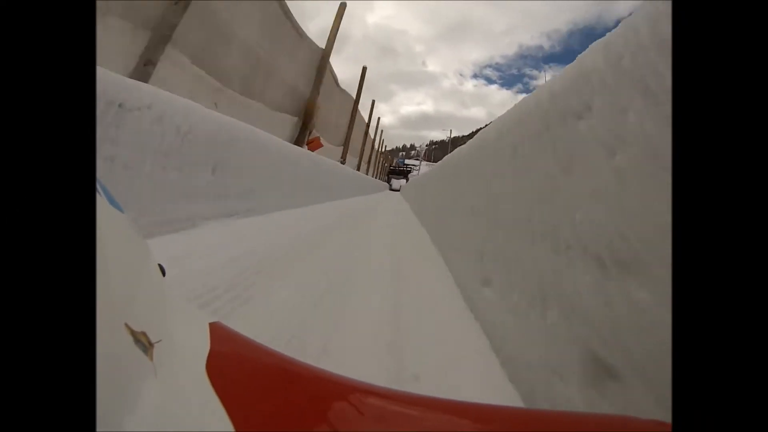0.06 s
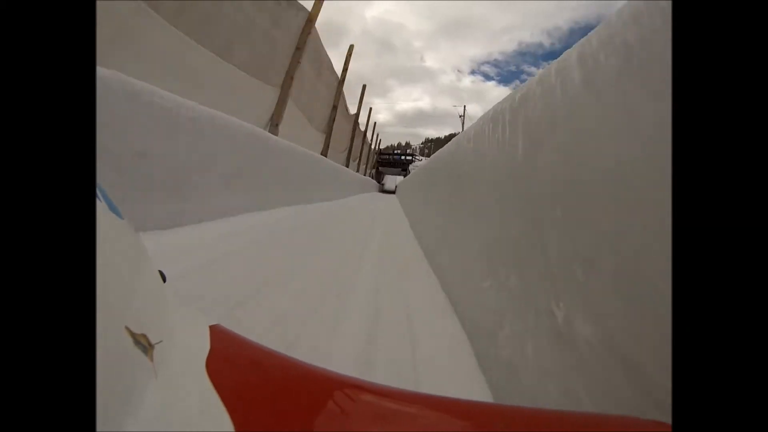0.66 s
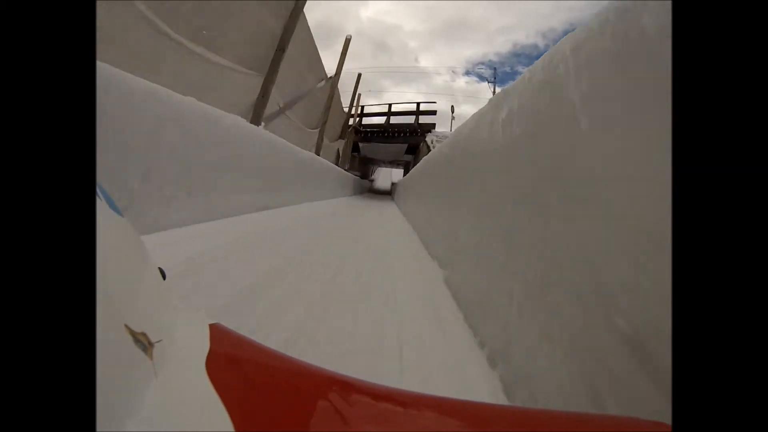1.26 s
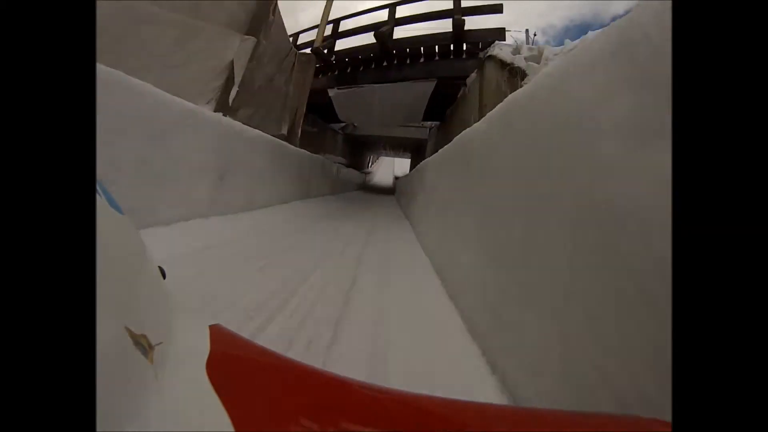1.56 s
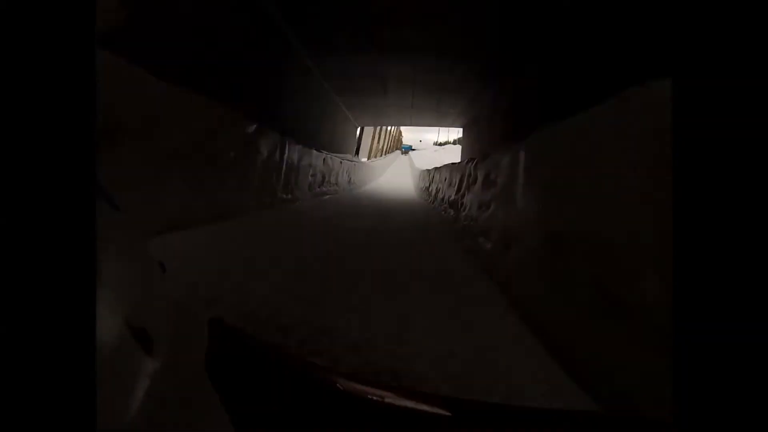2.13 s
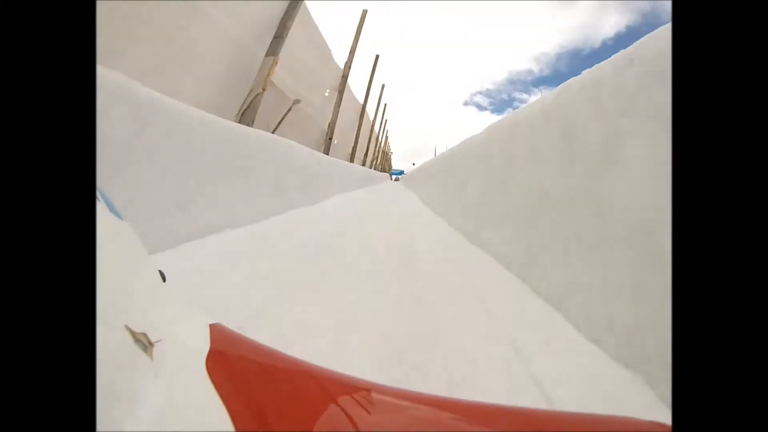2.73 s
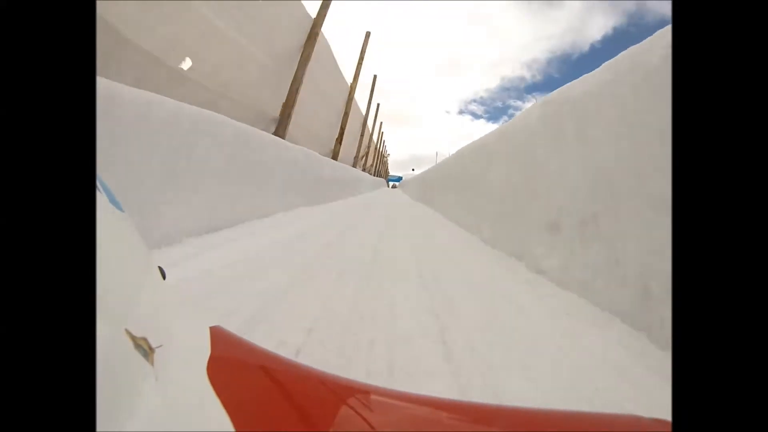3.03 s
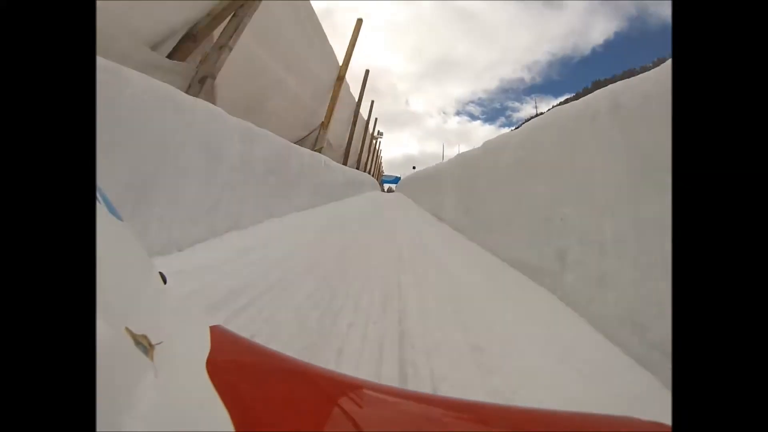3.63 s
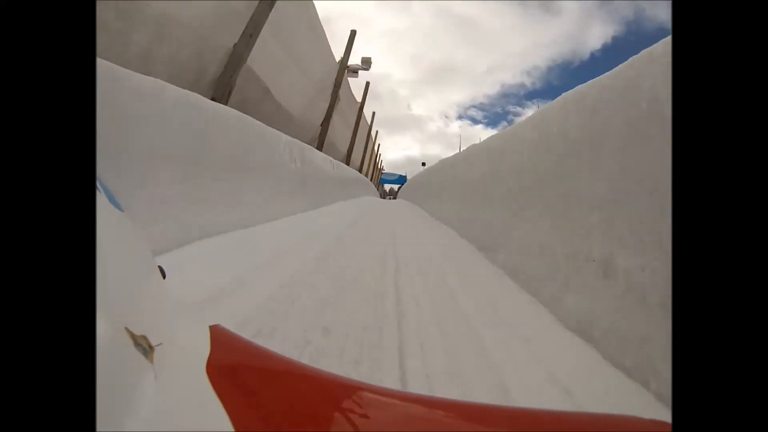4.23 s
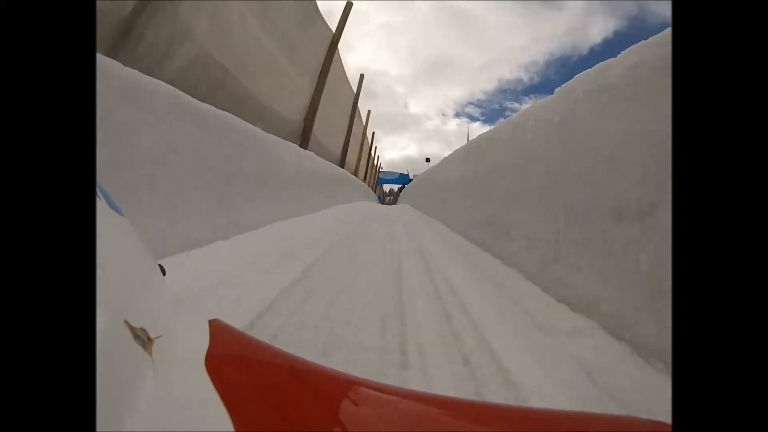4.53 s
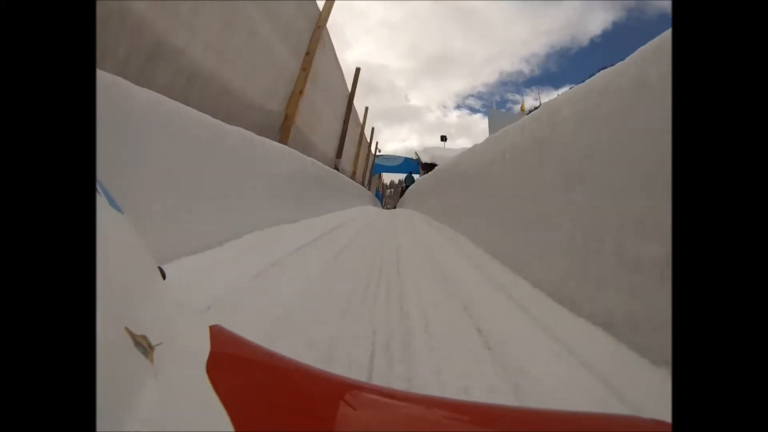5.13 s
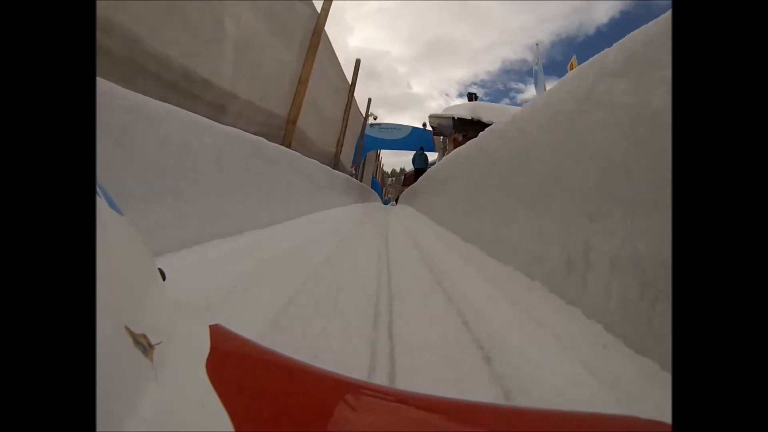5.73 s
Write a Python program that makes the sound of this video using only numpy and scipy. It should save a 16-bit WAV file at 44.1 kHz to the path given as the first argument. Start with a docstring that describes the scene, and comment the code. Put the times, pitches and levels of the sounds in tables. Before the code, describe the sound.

A bobsled speeds down an icy track with a deep booming rumble, buffeting wind, scraping runners and rattling fittings.

```python
"""A bobsled runs down an iced track, heard from a cased camera fixed to its hull.
From the start the hull booms near 35 Hz, air buffets the case, and the runners grind over the ice
and ring the shell. Ruts jolt the sled, loose fittings rattle and the mount ticks, hardest near 2.9 s.
After 4 s the runners scrape and bite harder; from 5.1 s the sled glides, with a last run of scrapes
around 5.7 s. The case muffles the treble throughout."""
import sys
import numpy as np
from scipy import signal
from scipy.fft import rfft, irfft, next_fast_len
from scipy.io import wavfile
from scipy.ndimage import uniform_filter1d

SR = 44100
rng = np.random.default_rng(int(sys.argv[2]) if len(sys.argv) > 2 else 0)


def dump(signal):
    """Clip the signal to [-1, 1] and save it as 16-bit WAV at the path in sys.argv[1]."""
    limited = np.clip(np.atleast_2d(signal).T, -1, 1)
    pcm = np.round(limited * 32767).astype(np.int16)
    wavfile.write(sys.argv[1], SR, pcm)


N = 264159

# ruts in the track: t/s, level/dB, relative frame knock/dB
RUTS = [(0.578, -27, -6), (0.907, -23.5, -24), (0.967, -33, -2), (1.114, -19.5, -9), (1.177, -28, -4),
        (1.528, -20, -21), (1.571, -17, -27), (1.654, -20.5, -12), (1.966, -21.5, -12),
        (2.366, -22.5, -10.5), (2.712, -25, -19), (2.73, -23, -20), (2.773, -25, -12), (2.8715, -18, 1),
        (2.8775, -12, -11), (2.916, -13, -17), (2.98, -22, -31), (3.005, -23.5, -8), (3.073, -26.5, -10),
        (3.112, -27.5, -5), (3.732, -25.5, -6)]
# modes of the loose fittings: f/Hz, t60/s, relative level/dB
FITTING_MODES = [(1350, 0.031, -2), (1531, 0.042, 23), (1620, 0.028, 18), (2030, 0.03, 16.5),
                 (2294, 0.058, 6.5), (2770, 0.014, 13), (3034, 0.022, 21.5), (3383, 0.022, 29.5),
                 (3410, 0.026, 21)]
# EQ of a dry, bright tick: f/Hz, gain/dB
TICK_EQ = [(1500, -3), (4000, -5), (7000, -1), (8300, -7), (11400, -1.5), (13100, -14), (14500, -13),
           (15800, -38)]


def undb(db):
    """Decibels to gain."""
    return 10 ** (np.asarray(db) / 20)


def unit(x):
    """Scale to rms 1."""
    return x / np.sqrt(np.mean(x ** 2))


def curves(table):
    """Automation lanes: each column after the time, interpolated at every sample."""
    s, *columns = np.transpose(table)
    return [np.interp(np.arange(N) / SR, s, c) for c in columns]


def swell(s, length_s):
    """A smooth bump of height 1 centred on s."""
    return np.exp(-(2 * (np.arange(N) / SR - s) / length_s) ** 2)


def walk(rate):
    """Smooth random modulation with rms 1: levels held 1 / rate s and slewed twice."""
    hold = max(int(SR / rate), 2)
    held = rng.standard_normal(N // 16)[np.arange(N) // hold]
    return unit(uniform_filter1d(uniform_filter1d(held, hold), hold))


def grains(rate, spread_db):
    """Random tiny impacts, rate a second, a few much larger than the rest."""
    struck = rng.random(N) < rate / SR
    size = undb(spread_db * np.minimum(rng.exponential(size=N), 5))
    return unit(struck * size * rng.choice([-1, 1], N))


def spurts(rate, decay_s):
    """Envelope of brief random bursts, rate a second, with rms 1."""
    hits = (rng.random(N) < rate / SR) * rng.uniform(0, 1, N) ** 2
    power = signal.lfilter([1], [1, -np.exp(-1 / (decay_s * SR))], hits + 1e-12)
    return unit(np.sqrt(power))


def colour(x, points):
    """Causal EQ through (f/Hz, gain/dB) points, falling 12 dB an octave beyond the ends."""
    hz, db = np.transpose(points)
    size = next_fast_len(2 * len(x), real=True) // 2 * 2
    f = np.maximum(np.fft.rfftfreq(size, 1 / SR), 1)
    skirts_db = 12 * (np.minimum(np.log2(f / hz[0]), 0) - np.maximum(np.log2(f / hz[-1]), 0))
    gain = undb(np.interp(np.log(f), np.log(hz), db) + skirts_db)
    cepstrum = irfft(np.log(gain))
    cepstrum[1:size // 2] *= 2  # minimum phase: nothing rings ahead of a hit
    cepstrum[size // 2 + 1:] = 0
    return irfft(rfft(x, size) * np.exp(rfft(cepstrum)))[:len(x)]


def resonate(x, hz, width):
    """One resonance, gain 1 at its centre."""
    return signal.lfilter(*signal.iirpeak(hz, hz / width, fs=SR), x)


def modes(table, t, detune):
    """Decaying sines, one row a mode, slightly retuned at every call."""
    hz, t60, db = np.transpose(table)[:, :, None]
    hz = hz * (1 + detune * rng.standard_normal(hz.shape))
    return undb(db) * np.exp(-np.log(1000) * t / t60) * np.sin(2 * np.pi * hz * t)


def add(out, s, db, sound):
    """Mix in a short sound whose loudest 3 ms have the given level."""
    loudest = np.sqrt(uniform_filter1d(sound ** 2, size=132, mode="constant").max())
    start = max(int(s * SR), 0)
    out[start:start + len(sound)] += (sound * undb(db) / loudest)[:N - start]


def ride(patchy_db=0.14, rut_decay_s=0.032, rut_shake_db=5.5, rut_bite_db=2.5):
    """How hard the hull shakes and the runners bite, in dB: track, scrapes, ruts and uneven ice."""
    # state of the track: t/s, shake/dB, bite/dB
    track = [(0.0, -37, -41.5), (0.18, -44.5, -48.5), (0.3, -34, -43), (0.55, -37.5, -43.5),
             (0.74, -41, -45.5), (1.3, -37.5, -45), (1.66, -33, -45.5), (1.84, -40.5, -47),
             (2.46, -38, -48.5), (2.515, -48, -61), (2.68, -42, -52.5), (2.76, -37.5, -45), (3.2, -38, -49),
             (3.72, -32, -45.5), (3.97, -39, -45), (4.12, -34.5, -34.5), (4.42, -43.5, -40),
             (4.55, -38.5, -45), (4.63, -40.5, -38), (4.76, -33.5, -39.5), (4.83, -43, -46.5),
             (5.11, -43.5, -49.5), (5.135, -49, -62.5), (5.99, -48.5, -60)]
    # a runner scrapes sideways: t/s, length/s, extra shake/dB, extra bite/dB
    scrapes = [(0.374, 0.048, -0.5, 9), (0.862, 0.057, 5, 6), (1.304, 0.076, 8, 5.5), (1.558, 0.068, 4, 10),
               (1.956, 0.033, 8, 4.5), (2.881, 0.075, 10.5, 6.5), (3.443, 0.42, -4, 8),
               (3.837, 0.051, 4, 9.5), (4.16, 0.14, 9, 6.5), (4.418, 0.06, -2.5, 5), (4.498, 0.062, 3, 6),
               (4.645, 0.019, 4.5, -2), (4.906, 0.034, 12, 5.5), (5.549, 0.1, 5, 11), (5.664, 0.055, 6, 10),
               (5.776, 0.1, 12, 10.5)]
    shake_db, bite_db = curves(track)
    for s, length_s, more_shake_db, more_bite_db in scrapes:
        scrape = swell(s, length_s)
        shake_db += more_shake_db * scrape
        bite_db += more_bite_db * scrape
    t, rut_s = np.arange(N) / SR, np.sort(np.array(RUTS)[:, 0])
    since_rut_s = np.abs(t - rut_s[np.searchsorted(rut_s, t) - 1])
    load = np.exp(-since_rut_s / rut_decay_s)
    patches = patchy_db * walk(22.01)
    return shake_db + rut_shake_db * load + patches, bite_db + rut_bite_db * load + patches


def creaks():
    """Under the hardest blows the mount gives way in a dense run of tiny slips."""
    # creaks of the mount: t/s, length/s, level/dB
    strains = [(2.92, 0.04, -56), (3.1, 0.077, -64)]
    slips = unit(colour(grains(450, spread_db=3), TICK_EQ))
    return slips * sum(undb(db) * swell(s, length_s) for s, length_s, db in strains)


def crumbs(bite_db, db=-69, follow=0.4, splinter_s=0.0002):
    """Ice crumbs crack under the runners; they only partly follow the bite, so a glide exposes them."""
    # EQ of a cracking crumb: f/Hz, gain/dB
    crumb_eq = [(2000, 1), (4200, 8), (7000, -4), (9000, -9.5), (12000, -11.5)]
    t = np.arange(256) / SR
    cracks = grains(110, spread_db=3)
    splinter = rng.standard_normal(len(t)) * np.exp(-t / splinter_s)
    crunch = unit(colour(np.convolve(cracks, splinter)[:N], crumb_eq))
    return crunch * undb(db + follow * (bite_db - bite_db.mean()))


def spray(bite_db, shake_db, hiss_db=-55, crackle_db=-80, crackle_follow=0.91, follow=0.96):
    """Ice dust hisses past and single crumbs prick the case; bumps and biting runners throw up more."""
    # loose ice dust on the track: t/s, relative level/dB
    dust = [(0, -6.5), (1.5, -5), (1.9, -8.5), (2.8, -9), (3.5, -12), (4.6, -18), (5.1, -8.5), (5.3, -11),
            (5.8, -12), (5.99, -2)]
    # EQ of the flying dust: f/Hz, gain/dB
    hiss_eq = [(2500, 9), (4300, 4), (5400, 5), (6200, -4.5), (7400, -2), (8300, -13), (11500, -7),
               (13000, -22), (14500, -29.5)]
    load_db = 0.06 * bite_db + 0.94 * shake_db
    thrown_db = follow * (load_db - load_db.mean()) + curves(dust)[0]
    hiss = unit(colour(grains(4000, spread_db=3.5), hiss_eq) * undb(2 * walk(50)))
    crackle = unit(colour(grains(100, spread_db=4.5), TICK_EQ))
    return undb(hiss_db + thrown_db) * hiss + undb(crackle_db + crackle_follow * thrown_db) * crackle


def ticks(trim_db=-3, slip_s=0.0012):
    """The plastic mount slips under load with dry, bright ticks."""
    # slips of the mount: t/s, level before the trim/dB
    slips = [(0.417, -45), (0.58, -49), (0.9102, -47), (1.0375, -48), (1.5253, -50), (1.854, -47),
             (1.966, -42), (2.175, -43.5), (2.189, -53), (2.219, -52), (2.375, -44), (2.403, -44.5),
             (2.4767, -49), (2.496, -40), (2.877, -42.5), (2.8938, -47), (2.909, -31.5), (2.9147, -48),
             (2.926, -41), (2.9397, -44), (2.9565, -43), (2.971, -49), (2.989, -49), (3.0051, -45),
             (3.025, -49), (3.074, -54), (3.1157, -45), (3.1418, -46), (4.108, -45), (4.239, -47),
             (5.045, -58), (5.219, -59), (5.367, -61), (5.808, -53)]
    out, t = np.zeros(N), np.arange(512) / SR
    for s, db in slips:
        burst = rng.standard_normal(len(t)) * np.exp(-t / slip_s)
        add(out, s, db + trim_db, colour(burst, TICK_EQ))
    return out


def chips(crumble_s=0.0033, attack_s=0.0011):
    """A chip of ice shatters in a few milliseconds and rings the spot of the shell that it hits. The row at
    2.877 s is no chip: it is the hardest rut cracking through the shell."""
    # chip strikes, plus the crack of the hardest rut at 2.877 s: t/s, level/dB, f/Hz
    strikes = [(0.775, -46, 3160), (2.567, -47.5, 1450), (2.596, -59, 3860), (2.686, -46, 3760),
               (2.748, -41, 3160), (2.769, -42, 3850), (2.822, -41, 3600), (2.836, -37, 1340),
               (2.877, -30, 2330), (3.416, -38, 3200), (4.289, -42, 3060), (4.413, -41, 2320),
               (4.433, -38, 2350), (4.484, -37, 2370), (5.24, -50, 1400)]
    out, t = np.zeros(N), np.arange(1536) / SR
    for s, db, hz in strikes:
        shatter = rng.standard_normal(len(t)) * np.exp(-t / crumble_s) * np.minimum(t / attack_s, 1)
        add(out, s, db, resonate(resonate(shatter, hz, hz / 7), hz, hz / 3))
    return out


def jiggle(bite_db, gain_db=-12, upper_db=-4, split_hz=2600, count=4):
    """Several unlike fittings keep chattering softly, low and high modes in their own time."""
    out, t = np.zeros(N), np.arange(2048) / SR
    upper = np.array(FITTING_MODES)[:, 0] > split_hz
    for _ in range(count):
        ring = modes(FITTING_MODES, t, detune=0.035)
        for part, db in ((~upper, 0), (upper, upper_db)):
            contact = spurts(rate=16, decay_s=0.009) * rng.standard_normal(N)
            out += undb(db) * unit(signal.fftconvolve(contact, ring[part].sum(0))[:N])
    return out / np.sqrt(count) * undb(gain_db + bite_db)


def wind(shake_db, db=-39, follow=0.54):
    """The headwind buffets the case, harder when the sled is shaken."""
    # f/Hz, gain/dB
    buffet_eq = [(25, -9.5), (52, -2.5), (66, 0.5), (95, -7), (135, -3.5), (210, -25.5), (600, -36.5)]
    buffet = unit(colour(rng.standard_normal(N), buffet_eq))
    return undb(db + walk(11) + follow * (shake_db - shake_db.mean())) * buffet


def drumming(hz=153, waver=0.0522):
    """Long bumps set the hull's panels swelling and fading on one unsteady hollow note."""
    # long bumps: t/s, length/s, level/dB
    bumps = [(1.237, 0.077, -35), (1.706, 0.074, -37), (3.122, 0.057, -35), (3.764, 0.11, -34.5),
             (4.705, 0.08, -36), (4.966, 0.099, -36.5), (5.78, 0.08, -32)]
    phase = 2 * np.pi * np.cumsum(hz * (1 + waver * walk(70))) / SR
    return unit(np.sin(phase)) * sum(undb(db) * swell(s, length_s) for s, length_s, db in bumps)


def groans(swell_s=0.0083, waver=0.089):
    """A short sideways skid sets the hull's hollow note swelling and dying, unsteady in pitch."""
    # skids of a runner: t/s, f/Hz, level/dB
    skids = [(2.08, 454, -33.5), (4.07, 490, -28.5), (4.879, 443, -30), (5.748, 475, -32)]
    out, t = np.zeros(N), np.arange(4096) / SR
    for s, hz, db in skids:
        phase = 2 * np.pi * np.cumsum(hz * (1 + waver * walk(245)[:len(t)])) / SR
        add(out, s, db, np.sin(phase) * t * np.exp(-t / swell_s))
    return out


def rattles(scuff_s=0.0052, scuff_db=-15, attack_s=0.00069, split_hz=2600, upper_db=4,
            crack_db=-4, crack_growth=0.26):
    """A loose fitting strikes and scuffs; soft hits ping, hard ones ring higher and add a dry crack."""
    # knocks of the fittings: t/s, level/dB, brightness/dB
    knocks = [(0.163, -38.5, -11), (0.228, -42, -23), (0.2707, -31, -21), (0.3598, -33, -5),
              (0.402, -33, -17), (0.548, -39, -6), (0.586, -34, 4), (0.61, -36, -30), (0.666, -39, -8),
              (0.7921, -31, -21), (0.8892, -28.5, -10.5), (1.016, -31, -39), (1.095, -35.5, -39),
              (1.1465, -35, -31), (1.222, -34.5, -32), (1.293, -28, -29), (1.373, -31.5, -31),
              (1.3798, -33.5, -2), (1.4424, -28.5, -31), (1.4988, -29.5, -20), (1.5602, -22, -32),
              (1.572, -53, -7), (1.6307, -26, -32), (1.654, -36, -8), (1.6908, -22.5, -17),
              (1.7318, -35, -3), (1.7704, -34.5, -24), (1.8747, -39, -26), (1.9633, -33, -16),
              (1.997, -34, -14), (2.081, -34.5, -20), (2.1367, -36.5, -9.5), (2.324, -36, -31),
              (2.3852, -39.5, -27), (2.714, -35.5, -28), (2.773, -38, -8), (2.8789, -35.5, -25),
              (2.8978, -32.5, -4), (3.0436, -37, -24), (3.107, -31.5, -32), (3.1695, -38.5, -36),
              (3.221, -30.5, -30), (3.348, -34, -20), (3.4865, -30, -16), (3.598, -30, -5),
              (3.7619, -25.5, -30), (3.823, -35, -9), (4.1543, -27.5, -2), (4.2695, -32.5, -20),
              (4.478, -34, -34), (4.71, -41, -23), (4.7726, -33.5, -2), (4.8403, -43, 1),
              (5.023, -33, -5.5), (5.043, -38, -13), (5.1094, -41, -35), (5.307, -35, -7.5),
              (5.321, -27.5, -0.5), (5.8022, -40, -26), (5.947, -36, -7)]
    # EQ of the contact's crack: f/Hz, gain/dB
    crack_eq = [(900, -30), (1350, 11), (1850, -11), (2400, 2), (3200, 6), (3800, -11), (4400, -36),
                (5500, -19), (9000, -44)]
    out, t = np.zeros(N), np.arange(3072) / SR
    upper = np.array(FITTING_MODES)[:, 0] > split_hz
    scuff_decay = np.exp(-t / scuff_s)
    for s, db, bright_db in knocks:
        upper_share = np.clip(undb(bright_db + upper_db) ** 2, .004, .9)
        ring = modes(FITTING_MODES, t, detune=0.018)
        contact = undb(scuff_db) * rng.standard_normal(len(t)) * scuff_decay
        contact[0] += 1  # the strike itself
        low = unit(signal.fftconvolve(contact, ring[~upper].sum(0))[:len(t)])
        high = unit(signal.fftconvolve(contact, ring[upper].sum(0))[:len(t)])
        ping = np.sqrt(1 - upper_share) * low + np.sqrt(upper_share) * high
        crack = unit(colour(rng.standard_normal(len(t)) * scuff_decay, crack_eq))
        knock = ping + undb(crack_db) * upper_share ** crack_growth * crack
        add(out, s, db, knock * np.minimum(t / attack_s, 1))
    return signal.sosfilt(signal.butter(2, 6000, fs=SR, output="sos"), out)


def jolts(contact_s=0.00084, knock_trim_db=-4, shudder_s=0.0033, shudder_db=-16, lead_s=0.0018):
    """A rut gives one sharp shove and a shudder; a hard edge also makes the frame knock."""
    # modes of the frame: f/Hz, t60/s, relative level/dB
    frame_modes = [(466, 0.016, 10), (625, 0.02, 8), (820, 0.02, 7.5), (909, 0.018, 2)]
    # f/Hz, gain/dB
    shudder_eq = [(150, -7), (250, -9), (480, 10), (900, 13), (1500, 15), (3500, -30)]
    out, t = np.zeros(N), np.arange(3072) / SR
    for s, db, knock_db in RUTS:
        shove = -np.exp(-np.abs(t - lead_s) / contact_s)
        noise = unit(colour(rng.standard_normal(len(t)), shudder_eq))
        shudder = undb(shudder_db) * noise * np.exp(-t / shudder_s)
        knock = undb(knock_db + knock_trim_db) * modes(frame_modes, t, detune=0.03).sum(0)
        add(out, s, db, (shove + shudder + knock) * np.minimum(t / lead_s, 1))
    return signal.sosfilt(signal.butter(2, [60, 2600], "band", fs=SR, output="sos"), out)


def rumble(shake_db, hollow_db=-5.5, gust_db=2, sway_db=3, clatter_db=-15, clatter_growth=0.28):
    """Bumpy ice shakes the hull, whose hollow notes take turns to stand out; rough ice adds clatter."""
    # hollow resonances of the hull: f/Hz, width/Hz, drive/dB
    hull_modes = [(154.7, 30, 4), (437, 59, 3), (539, 12.5, 0.5), (793, 22, -6)]
    # EQ of the broad rumble: f/Hz, gain/dB
    rumble_eq = [(45, -17), (90, -4), (160, 1), (225, -16), (310, -13), (380, -14), (520, -11.5),
                 (650, -49.5), (1000, -41.5)]
    clatter_eq = [(250, -7), (700, -1.5), (850, -4), (1050, -13.5), (1500, -4.5), (3000, -41.5)]
    push = grains(2500, spread_db=2.5) * undb(gust_db * walk(45))
    hollow = sum(resonate(push * undb(db + sway_db * walk(20)), hz, width)
                 for hz, width, db in hull_modes)
    hollow = signal.sosfilt(signal.butter(4, [95, 850], "band", fs=SR, output="sos"), hollow)
    clatter = unit(colour(grains(500, spread_db=6), clatter_eq))
    clatter *= undb(clatter_db + clatter_growth * (shake_db - shake_db.mean()))
    return undb(shake_db) * (unit(colour(push, rumble_eq)) + undb(hollow_db) * unit(hollow) + clatter)


def runners(bite_db, grind_db=-2, chatter_db=1.5, sway_db=2, case_hz=4200):
    """Steel crushes ice grains in rasping spurts; each shell resonance takes its own changing share."""
    # resonances of the shell: f/Hz, width/Hz, drive/dB
    shell_modes = [(1215, 136, -1.5), (1498, 86, -0.5), (1657, 32, -0.5), (1980, 96, -2.5), (2307, 63, 1.5),
                   (2630, 116, -10.5), (3225, 79, -3.5), (3360, 63, -3.5), (3526, 27, -2.5), (3727, 46, -8),
                   (4800, 48, -15)]
    # EQ of steel grinding on ice: f/Hz, gain/dB
    grind_eq = [(250, -13), (500, 10.5), (680, -5.5), (950, -7.5), (1400, -0.5), (1830, -15), (2200, -4),
                (2850, -22), (3500, -18), (4000, -12.5), (4450, -26), (5300, -32), (6200, -42)]
    rasp = np.hypot(1, 0.8 * spurts(rate=150, decay_s=0.002))
    chatter = undb(chatter_db * walk(40)) * rasp
    ring = np.zeros(N)
    for hz, width, db in shell_modes:
        drive = chatter * undb(db + sway_db * walk(25.014))
        ring += resonate(drive * grains(1200, spread_db=2.5), hz, width)
    ring = signal.sosfilt(signal.butter(4, [1000, case_hz], "band", fs=SR, output="sos"), ring)
    grind = colour(chatter * grains(1500, spread_db=2), grind_eq)
    return undb(bite_db) * (unit(ring) + undb(grind_db) * unit(grind))


def boom(shake_db, hz=35.07, db=-20.5, waver=0.045, unrest_growth=0.73, flutter_db=1.14,
         octave_db=-24, octave_sway_db=3):
    """The hull's lowest mode: almost a sine with a faint octave, wavering more on a rough ride."""
    # brief dips in the boom: t/s, length/s, depth/dB
    dips = [(0.281, 0.065, 12), (0.839, 0.049, 13), (1.224, 0.071, 10.5), (1.477, 0.13, 9),
            (2.69, 0.11, 4.5), (2.86, 0.067, 6), (3.033, 0.066, 6), (3.2, 0.071, 6.5), (3.82, 0.042, 11),
            (4.063, 0.16, 10), (5.725, 0.065, 7.5)]
    dip_db = sum(depth_db * swell(s, length_s) for s, length_s, depth_db in dips)
    unrest = undb(unrest_growth * (shake_db - shake_db.mean()))
    phase = 2 * np.pi * np.cumsum(hz * (1 + waver * unrest * walk(30))) / SR
    octave = undb(octave_db + octave_sway_db * walk(11)) * np.sin(2 * phase)
    return unit(np.sin(phase) + octave) * undb(db - dip_db + flutter_db * unrest * walk(25.05))


def scene():
    """Body, ice, fittings and mount in one mono mix, all on the same ride."""
    shake_db, bite_db = ride()
    body = boom(shake_db) + wind(shake_db) + rumble(shake_db) + jolts() + groans() + drumming()
    ice = runners(bite_db) + spray(bite_db, shake_db) + crumbs(bite_db) + chips()
    return (body + ice + jiggle(bite_db) + rattles() + ticks() + creaks())[None]


def record(dry):
    """The camera cuts the top steeply above 15.7 kHz."""
    return signal.sosfilt(signal.ellip(8, .2, 70, 15700, fs=SR, output="sos"), dry)


dry = scene()
out = record(dry)
dump(out)
```